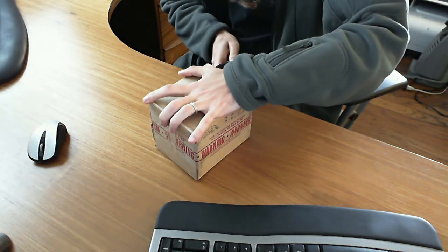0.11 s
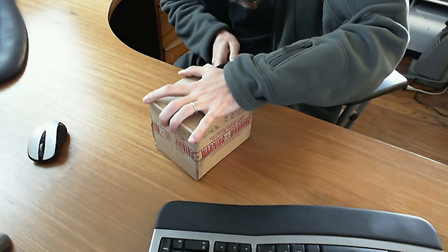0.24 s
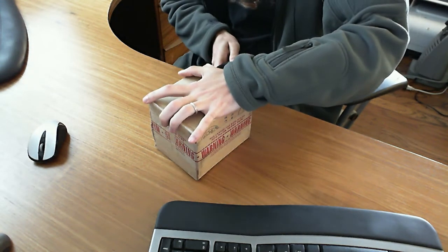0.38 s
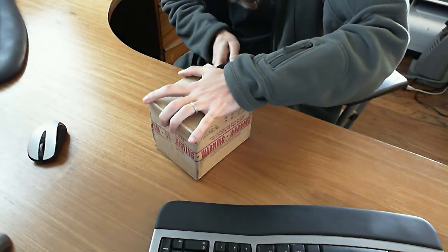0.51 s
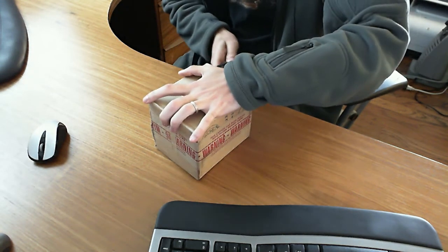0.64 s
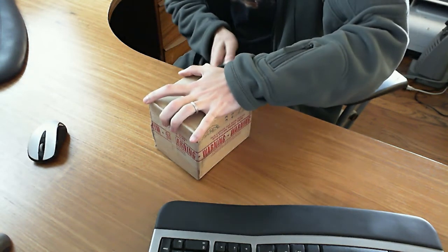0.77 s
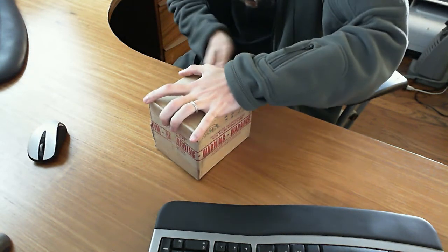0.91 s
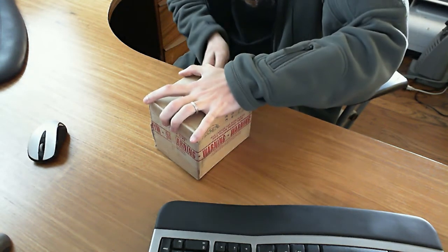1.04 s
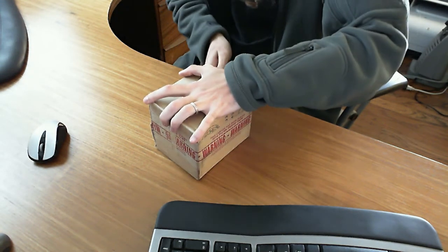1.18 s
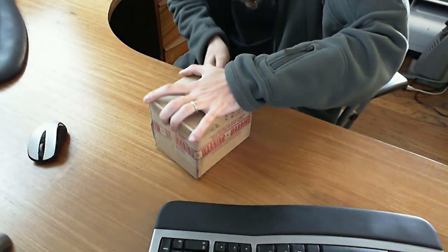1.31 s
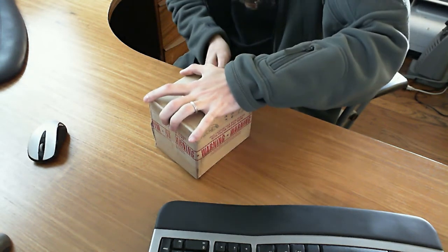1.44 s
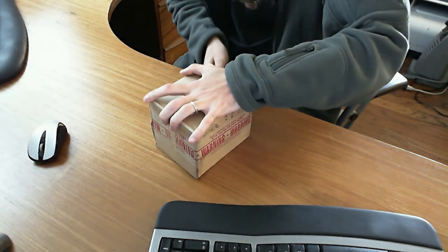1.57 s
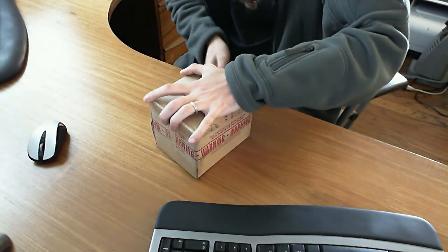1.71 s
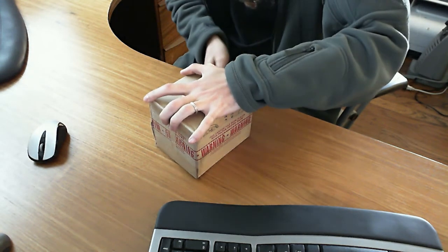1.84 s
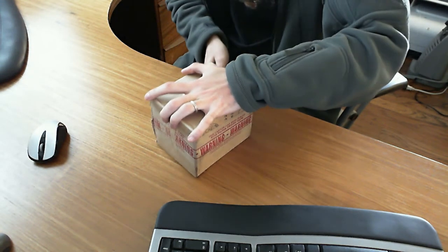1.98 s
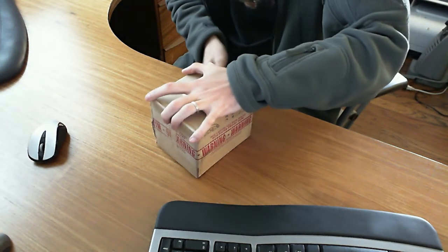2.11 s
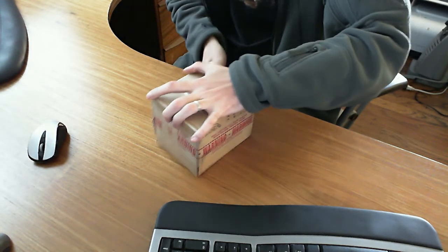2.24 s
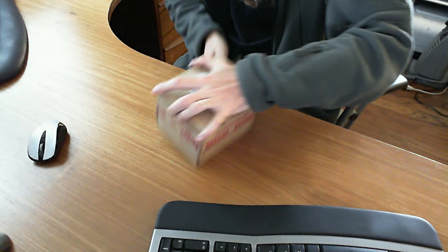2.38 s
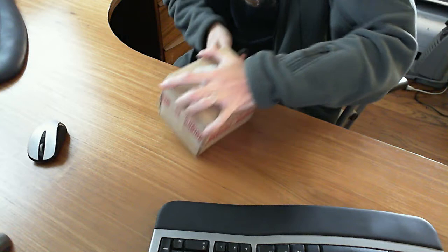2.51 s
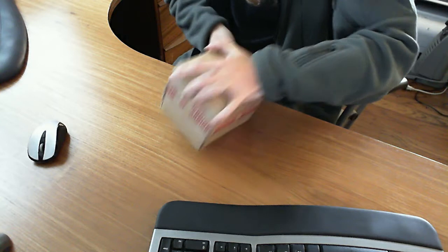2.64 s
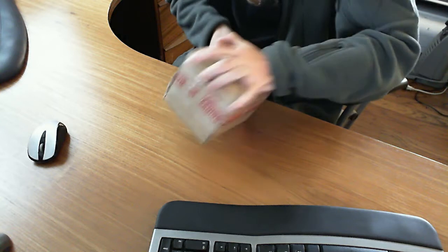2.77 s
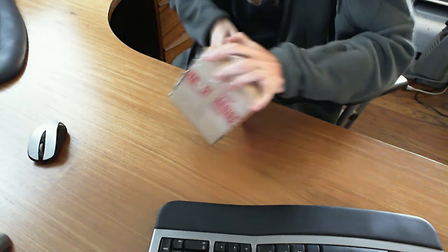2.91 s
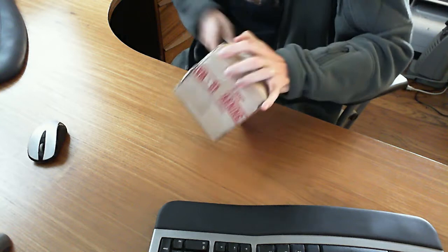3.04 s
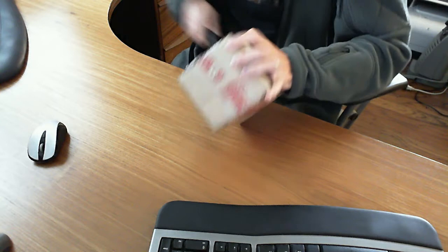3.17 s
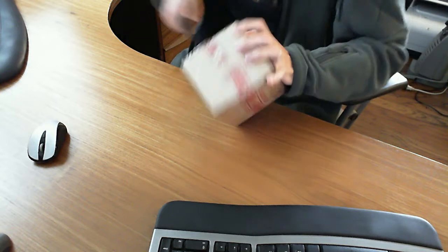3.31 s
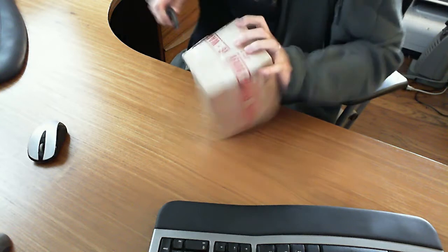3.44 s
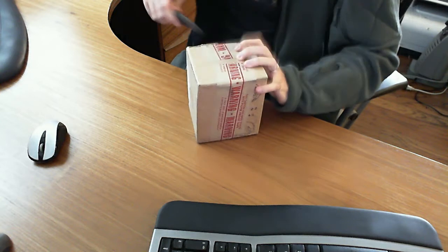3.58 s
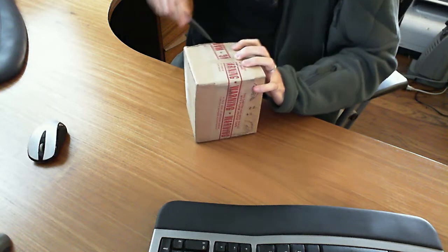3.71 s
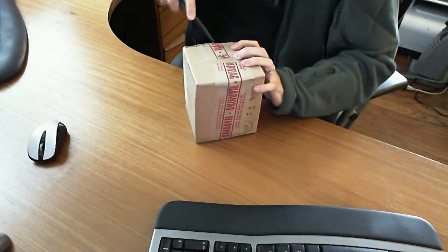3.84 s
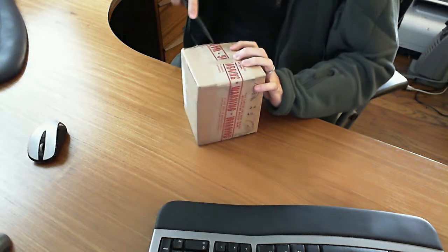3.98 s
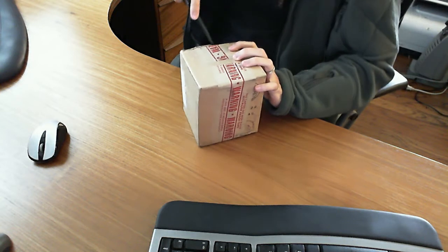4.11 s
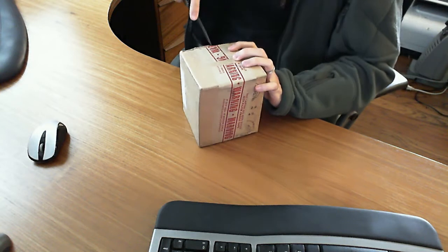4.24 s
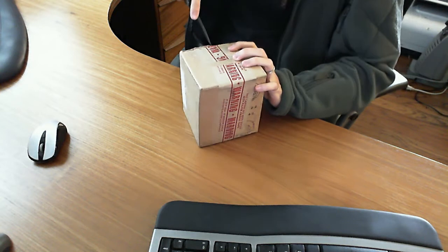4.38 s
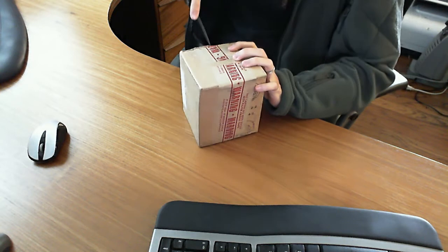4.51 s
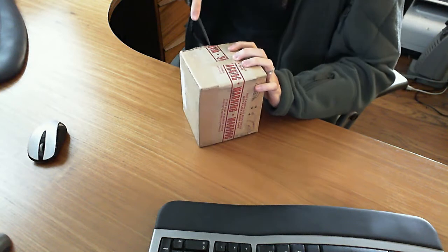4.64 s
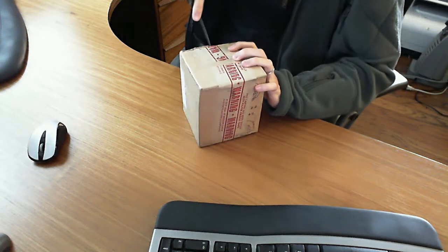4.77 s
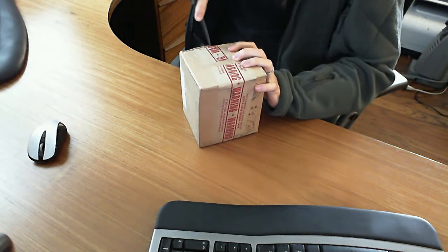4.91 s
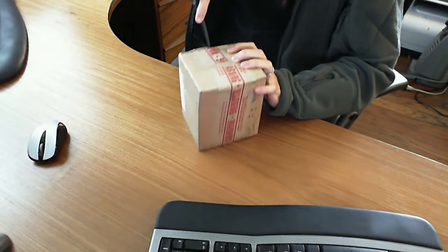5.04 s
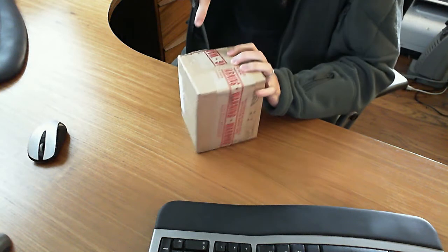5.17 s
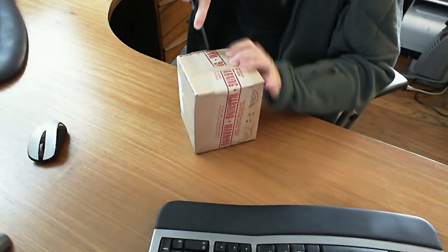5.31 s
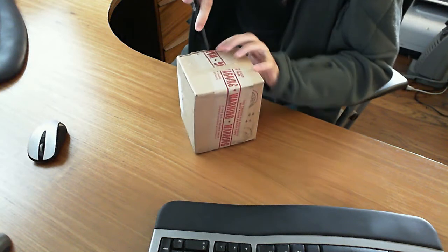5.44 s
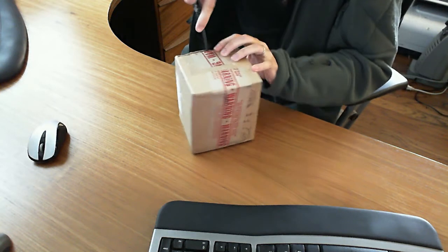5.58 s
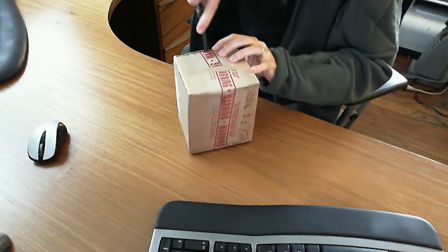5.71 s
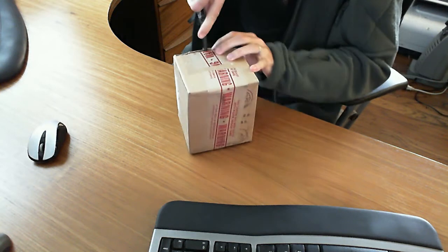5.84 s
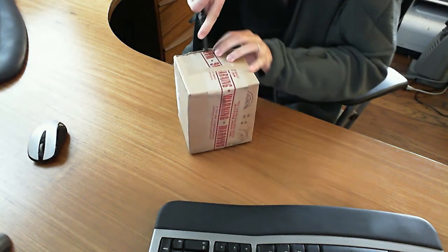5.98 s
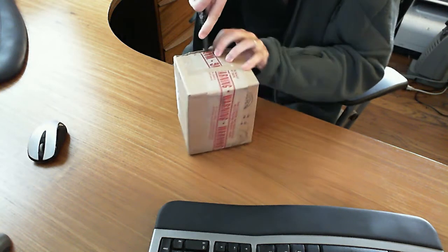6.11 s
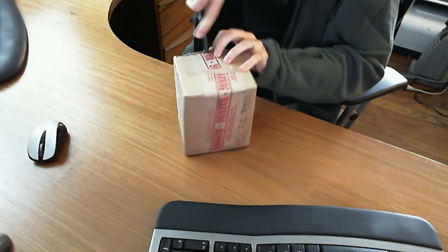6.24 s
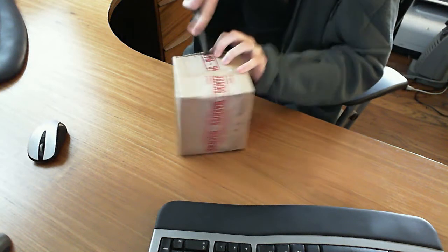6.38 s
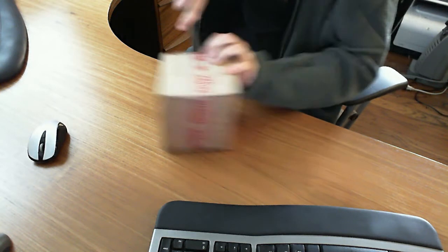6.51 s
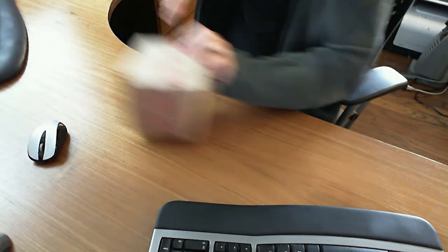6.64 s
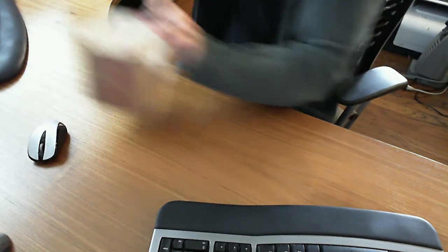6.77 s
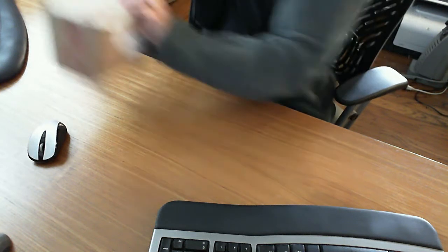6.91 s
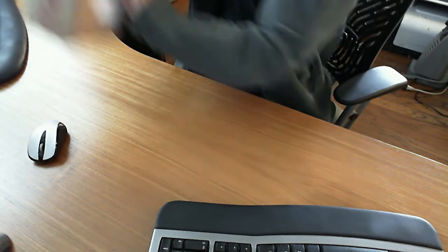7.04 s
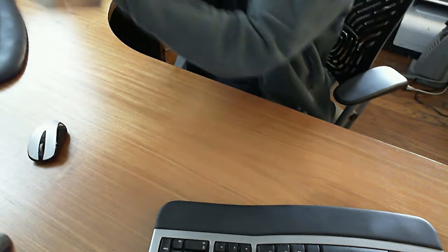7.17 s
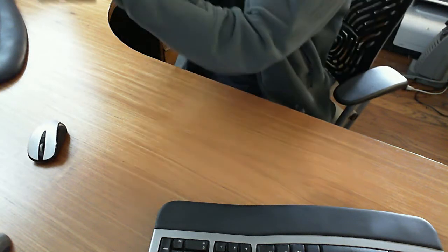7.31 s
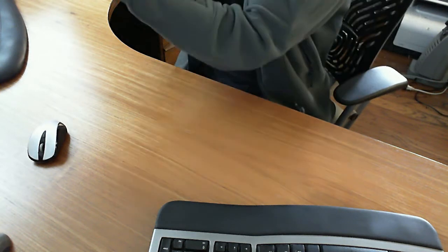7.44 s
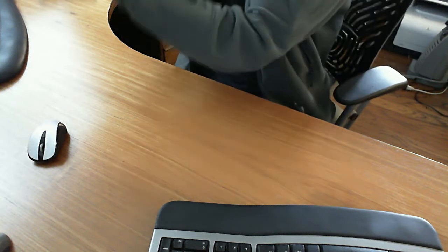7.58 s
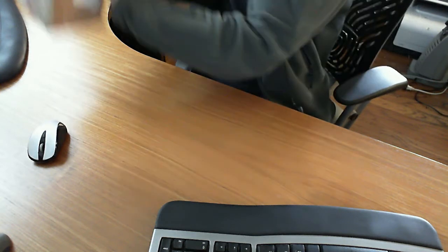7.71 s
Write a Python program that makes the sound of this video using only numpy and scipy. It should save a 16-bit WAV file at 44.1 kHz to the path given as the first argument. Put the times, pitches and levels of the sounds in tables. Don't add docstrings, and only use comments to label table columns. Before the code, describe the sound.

Close indoor sound from a cheap microphone with steady hiss, low fan hum and thin high whine. A sharp tape snap, then dry scratching strokes on a cardboard box. The box is turned over and thumps on the wooden desk, booming. After a quiet spell come glue ticks, knocks, a stuttering judder, corner taps and faint last clicks.

```python
import sys
import numpy as np
from scipy import signal
from scipy.fft import rfft, irfft, next_fast_len
from scipy.io import wavfile
from scipy.ndimage import uniform_filter1d, map_coordinates

SR = 44100
rng = np.random.default_rng(int(sys.argv[2]) if len(sys.argv) > 2 else 0)


def field_ratio(decibels):
    return 10 ** (np.asarray(decibels, dtype=float) / 20)


def transcribe(signal):
    frames = np.atleast_2d(signal).T
    limited = np.clip(frames, -1, 1)
    pcm = np.round(limited * 32767).astype(np.int16)
    wavfile.write(sys.argv[1], SR, pcm)


N = 342419
t = np.arange(N) / SR


def unit(x):
    return x / np.sqrt(np.mean(x ** 2) + 1e-20)


def peak(x):
    return x / np.abs(x).max()


def decay(u, t60):
    return field_ratio(-60 * u / t60)


def sine(hz, u):
    return np.sin(2 * np.pi * hz * u)


def onset(u, seconds):
    return 1 - np.exp(-u / seconds)


def along(points, hz):
    f, v = np.transpose(points)
    return np.interp(np.log(hz + 1), np.log(f + 1), v)


def filtered(x, response):
    size = next_fast_len(len(x) + 8192)
    return irfft(rfft(x, size) * response(np.fft.rfftfreq(size, 1 / SR)), size)[:len(x)]


def coloured(spectrum):
    return lambda hz: field_ratio(along(spectrum, hz))


def resonances(modes):
    def response(f):
        total = 0
        for k, (centre, width, db) in enumerate(modes):
            damping = 1j * f * width
            total = total + (-1) ** k * field_ratio(db) * damping / (centre ** 2 - f ** 2 + damping)
        return total
    return response


def friction(response, grain_db, patchy_db):
    clump = map_coordinates(rng.standard_normal(N // 100 + 4), [np.arange(N) / 100], order=1)
    slips = rng.standard_normal(N) * field_ratio(grain_db * clump)
    z = signal.stft(slips, nperseg=512)[2]
    patches = uniform_filter1d(rng.standard_normal(z.shape), 5, 0)
    patches = unit(uniform_filter1d(patches, 8, 1))
    patchy = signal.istft(z * field_ratio(patchy_db * patches), nperseg=512)[1][:N]
    return unit(filtered(patchy, response))


def strokes(peak_s, rise_s, fall_s, db, rest_db):
    roundness = 0.99
    power = np.full(N, field_ratio(rest_db) ** 2)
    for s, rise, fall, top_db in zip(peak_s, rise_s, fall_s, db):
        a, b = max(int((s - 2 * rise) * SR), 0), int((s + 2 * fall) * SR)
        u = t[a:b] - s
        distance = np.maximum(-u / rise, u / fall)
        power[a:b] += field_ratio(top_db - 20 * distance ** roundness) ** 2
    return np.sqrt(power)


# (pitch [Hz], t60 [s])
ROOM_DECAY = [(100, 0.2), (1000, 0.75), (6000, 0.41), (15000, 0.62)]


def echoed(hit, wet_db):
    wall_gap_s = 0.006
    hz, s, z = signal.stft(rng.standard_normal(SR // 3), SR, nperseg=256)
    tail = signal.istft(z * decay(s, along(ROOM_DECAY, hz)[:, None]), SR, nperseg=256)[1]
    tail = tail / np.linalg.norm(tail)
    wet = signal.fftconvolve(hit, np.pad(tail, (int(wall_gap_s * SR), 0)))
    return np.pad(hit, (0, len(wet) - len(hit))) + field_ratio(wet_db) * wet


def add(track, s, sound):
    part = track[round(s * SR):][:len(sound)]
    part += sound[:len(part)]


# (pitch [Hz], level [dB per Hz])
HISS_SPECTRUM = [(15, -8), (30, 7.5), (60, 3.5), (125, 1), (250, -9.5), (500, -6), (1000, -14), (2000, -16),
                 (4000, -19.5), (6000, -20), (9000, -21), (13000, -17.5), (15800, -15)]
# (pitch [Hz], width [Hz], level [dB])
FAN_TONES = [(176.4, 6.1, -56.5), (239, 40, -57.5)]


def background():
    out = field_ratio(-47.5) * friction(coloured(HISS_SPECTRUM), grain_db=0.2, patchy_db=0.3)
    for hz, width, db in FAN_TONES:
        out += field_ratio(db) * friction(resonances([(hz, width, 0)]), grain_db=-1.0, patchy_db=-1.3)
    return out


# (pitch [Hz], level [dB])
WHINE_TONES = [(6750, -57), (13500, -56.5)]


def whine():
    pictures_per_s, first_s = 7.5, 0.1075
    reading = np.abs((t - first_s) * pictures_per_s % 1 - 0.5) < 0.4
    gate = uniform_filter1d(reading * 1.0, size=60)
    return gate * sum(field_ratio(db) * np.sqrt(2) * sine(hz, t) for hz, db in WHINE_TONES)


# (time [s], offset [full scale])
OFFSET_DRIFT = [(0, -.054), (.86, -.054), (.96, -.042), (3.52, -.042), (3.6, -.032), (6, -.031),
                (6.35, -.018), (7.76, -.018)]


def offset():
    s, level = np.transpose(OFFSET_DRIFT)
    return np.interp(t, s, level)


# (time [s], rise [s], fall [s], low rumble level [dB], upper rumble level [dB])
DESK_JOLTS = [(0, .05, 0.08, -48, -51), (.62, .2, 0.34, -51, -64), (.9, 0.11, 1, -44, -48),
              (1.52, 0.1, 0.19, -34, -38), (1.85, 0.22, 0.25, -38, -48), (2.1, 0.25, 0.15, -45, -56),
              (3.46, 0.024, 0.13, -29, -52), (3.53, .015, 0.25, -38, -32.5), (5.3, 0.048, 0.14, -54, -43),
              (5.72, 0.077, .4, -41, -45), (6.1, 0.26, 0.4, -51.5, -37.5), (6.3, .03, 0.1, -53, -35),
              (6.7, 0.36, 0.31, -63, -55)]
# (pitch [Hz], level [dB per Hz])
RUMBLE_BANDS = [
    [(20, -19), (35, 8.5), (60, 0), (95, -14), (125, -32.5)],
    [(98, -4.5), (115, 7.5), (160, -3), (250, 5), (320, -36.5)],
]
# (frame level [dB], top level [dB])
CALM_LEVELS = (-59.5, -56)


def shaking():
    s, rise, fall, *levels = np.transpose(DESK_JOLTS)
    out = np.zeros(N)
    for db, calm_db, band in zip(levels, CALM_LEVELS, RUMBLE_BANDS):
        rumble = friction(coloured(band), grain_db=1.5, patchy_db=3.0)
        out += strokes(s, rise, fall, db, calm_db) * rumble
    return out


# (pitch [Hz], level [dB per Hz])
TAPE_SPECTRUM = [(2940, -14.5), (5000, -3), (5500, -3), (6000, -2), (7330, 3.5), (9320, 3), (10400, 0.5),
                 (11900, 2.5), (13700, -4.5), (15700, -11.5)]
# (pitch [Hz], width [Hz], level [dB])
NAIL_MODES = [(1570, 460, -5), (2330, 180, -3), (3050, 1550, -5.5), (3990, 580, 0), (4700, 900, -6.5)]
# (pitch [Hz], width [Hz], level [dB])
BOX_MODES = [(286, 76, 1.5), (463, 232, -1.5), (639, 151, -1), (850, 172, -2.5), (1030, 486, -5.5),
             (1416, 580, -13)]
# (peak time [s], rise [s], fall [s], hiss level [dB], pressure on the card [dB])
SCRATCH_STROKES = [(.445, .015, 0.053, -47, -6), (.585, 0.062, 0.3, -41.5, -2.5),
                   (.74, .2, 0.25, -48.5, -20), (0.863, 0.16, 0.014, -37, -17),
                   (0.881, 0.0096, .04, -18.5, -13), (.9, .01, 0.17, -26, -9.5),
                   (1.076, 0.074, 0.097, -26, -6.5), (1.113, .06, 0.063, -30.5, -18),
                   (1.22, 0.096, .08, -33, -12.5), (1.243, 0.085, 0.09, -31, -10.5),
                   (1.265, .06, 0.064, -33.5, -8), (1.36, 0.086, 0.11, -34, -10),
                   (1.394, 0.11, 0.083, -32.5, -15), (1.49, .05, .08, -34, -5.5),
                   (1.515, 0.07, 0.095, -32, -6), (1.64, .08, .08, -43, -12),
                   (1.695, 0.099, 0.095, -31.5, -9.5), (1.77, .04, .08, -37.5, -6),
                   (1.8, 0.089, 0.09, -35, -8), (1.835, .06, 0.073, -40.5, -14),
                   (2.115, 0.12, 0.12, -38, -8.5), (2.36, 0.18, 0.24, -40, -6),
                   (2.46, 0.21, 0.18, -40.5, -11)]
TURNING_STROKES = [(2.76, 0.16, 0.67, -43, -13), (2.95, 0.42, .05, -51, 0.5),
                   (3.025, 0.016, 0.044, -40.5, 7.5), (3.04, .015, 0.099, -44.5, 1),
                   (3.29, .08, .3, -44.5, -15), (3.43, 0.22, 0.28, -41.5, -21),
                   (3.474, 0.028, 0.065, -47, 11), (3.526, 0.035, 0.079, -31, -19),
                   (3.538, 0.023, 0.039, -35.5, 6), (3.58, .02, 0.21, -50.5, 5.5)]
PRYING_STROKES = [(5.038, 0.27, 0.49, -49.5, -4.5), (5.279, 0.011, 0.075, -46, 4.5),
                  (5.39, 0.36, .1, -48, -15), (5.6, 0.96, .1, -55, 0.5), (5.682, 0.0056, .04, -36, -11),
                  (5.757, 0.094, 0.11, -29.5, -12.5), (5.86, .05, .2, -52.5, 5),
                  (6.055, 0.13, 0.24, -44, 7), (6.19, .05, 0.72, -57, 5), (6.301, .011, 0.043, -41, 13.5),
                  (6.33, .02, 0.46, -45.5, 3), (6.55, 0.53, 0.29, -40, -9), (6.722, 0.12, 0.16, -40, -1.5),
                  (6.8, 0.089, 0.12, -46.5, 2.5), (6.976, 0.25, 0.51, -50, -5.5),
                  (7.292, 0.039, 0.049, -45, -9), (7.388, 0.015, 0.034, -34.5, -11.5),
                  (7.41, 0.11, 0.2, -43, -12), (7.717, 0.004, 0.023, -35.5, -9),
                  (7.727, 0.01, 0.016, -30.5, -28), (4.482, .006, .04, -48, -20),
                  (7.75, 0.053, .15, -45.5, 0)]


def rubbing():
    resting_db, resting_card_db = -60, -57
    nail_db, nail_per_pressure = -5, 0.46
    s, rise, fall, db, press_db = np.transpose(SCRATCH_STROKES + TURNING_STROKES + PRYING_STROKES)
    tape = strokes(s, rise, fall, db, resting_db)
    tape = tape * friction(coloured(TAPE_SPECTRUM), grain_db=0.5, patchy_db=2.0)
    nail_level = db + nail_db + nail_per_pressure * np.minimum(press_db, 0)
    nail = strokes(s, rise, fall, nail_level, resting_db + nail_db)
    nail = nail * friction(resonances(NAIL_MODES), grain_db=1.5, patchy_db=2.5)
    card = strokes(s, rise, fall, db + press_db, resting_card_db)
    card = card * friction(resonances(BOX_MODES), grain_db=1.5, patchy_db=2.0)
    return tape + nail + card


# (time [s], peak level [dB], lower pitch [Hz], upper pitch [Hz], hardness [dB])
BOX_KNOCKS = [(0.427, -33.5, 366, 655, -6), (0.874, -12, 644, 720, -16), (0.8865, -21, 600, 696, -19),
              (0.893, -19, 513, 600, -22), (1.027, -27, 425, 610, -16), (1.468, -28.5, 480, 650, -5),
              (1.687, -26.5, 590, 730, -5), (3.0173, -20, 635, 1270, -5), (3.5274, -13, 460, 886, -12),
              (3.0227, -19, 660, 1220, -5), (3.523, -18.5, 646, 1150, -7), (5.275, -32, 515, 840, -16),
              (5.677, -28.5, 440, 800, -10), (5.698, -29.5, 550, 690, -5), (5.72, -33, 476, 725, -15),
              (5.848, -33, 514, 780, -18), (5.87, -30, 412, 760, -20), (6.152, -16.5, 440, 775, -15.5),
              (6.197, -27.5, 416, 630, -23), ]
# (pitch [Hz], width [Hz], level [dB])
EDGE_MODES = [(1403, 170, -2), (1750, 100, -2.5), (2520, 550, -5.5), (2730, 230, -19)]


def knocks():
    out, u = np.zeros(N), t[:SR // 6]
    for s, db, low_hz, high_hz, hard_db in BOX_KNOCKS:
        wall = (sine(low_hz, u) + 0.66 * sine(high_hz, u)) * decay(u, 0.036)
        push = rng.standard_normal(len(u)) * decay(u, 0.0084)
        body = peak(wall + 0.5 * peak(filtered(push, resonances(BOX_MODES))))
        edges = field_ratio(hard_db) * peak(filtered(push, resonances(EDGE_MODES)))
        add(out, s, field_ratio(db) * echoed(body + edges, wet_db=-13.5))
    return out


# (time [s], peak level [dB], film pitch [Hz], dull part relative level [dB], dull pitch [Hz])
TAPE_SNAPS = [(0.4278, -30.5, 6760, -4, 4860), (0.8739, -5.5, 8000, -7, 3420),
              (0.8754, -9.5, 12000, -15, 1560), (0.8802, -9, 11500, -16, 3200),
              (0.885, -9.5, 12000, -11, 3200), (0.891, -14, 12000, -3, 4700),
              (3.022, -19.5, 9000, -18, 4260), (3.4535, -30, 7800, -10, 2920),
              (3.5246, -11, 6000, -8, 4300), (3.821, -39, 6750, -1, 3370), (4.764, -37, 6800, -22, 3620),
              (5.277, -31, 7110, -18, 5080), (5.293, -28.5, 7600, -9.5, 4100),
              (5.707, -19, 9120, -12, 5150), (5.7258, -18.5, 7250, -14, 4440), (6.11, -39, 6760, -7, 3310),
              (6.153, -35, 6750, -18, 2540), (6.2917, -22, 12700, -9.5, 3200),
              (6.456, -28.5, 7670, -7, 2670), (7.4994, -34, 6750, -30, 3370)]
GLUE_TICKS = [(3.028, -15.5, 8900, -25, 2500), (3.031, -21, 8300, -25, 2500),
              (3.0335, -22, 8600, -25, 2500), (3.039, -18, 8300, -25, 2500), (3.508, -20, 9500, -6, 4760),
              (4.4735, -26, 6930, -13, 4500), (5.283, -29, 7800, -20, 5030), (5.2858, -29, 6800, -9, 5030),
              (5.676, -16.5, 7450, -16, 2800), (5.685, -30, 8400, -25, 5000),
              (5.6981, -9.5, 7300, -20, 4580), (6.049, -35, 10900, -8, 4500),
              (6.056, -29, 11500, -20, 3500), (6.269, -38, 6800, -1, 3400), (7.3773, -25, 6500, -3, 6200),
              (7.3805, -22, 6500, -2, 6300), (7.3855, -23, 11000, -8, 8000), (7.3885, -23, 11500, -4, 7800),
              (7.391, -29, 11000, -4, 7800), (7.3943, -28, 8200, -10, 4000), (7.41, -32, 8500, -20, 4000),
              (7.723, -25, 9000, -20, 4500), (7.729, -23, 9000, -20, 4500)]


def snaps():
    snap_t60, tick_t60 = 0.014, 0.006
    crack_db, crack_s = -10.5, 0.00012
    out, u = np.zeros(N), t[:SR // 8]
    crack = field_ratio(crack_db) * peak(u * np.exp(-u / crack_s) * np.cos(u / crack_s))
    rows = [(*row, snap_t60) for row in TAPE_SNAPS] + [(*row, tick_t60) for row in GLUE_TICKS]
    for s, db, film_hz, dull_db, dull_hz, t60 in rows:
        sizes = field_ratio(0.95 * rng.standard_normal(len(u)))
        bright_slips, dull_slips = rng.standard_normal((2, len(u))) * sizes
        bright = filtered(bright_slips * decay(u, t60), coloured(TAPE_SPECTRUM))
        taut = resonances([(film_hz, 2200, 0)])
        film = filtered(bright, lambda f: 0.59 + taut(f))
        panel = resonances([(dull_hz, 750, 0)])
        card = filtered(dull_slips * decay(u, t60 * 0.41), lambda f: panel(f) ** 2)
        burst = peak(film) + field_ratio(dull_db) * peak(card)
        add(out, s, field_ratio(db) * echoed(burst * onset(u, 0.00018) + crack, wet_db=-9.0))
    return out


# (start [s], end [s], pitch [Hz], width [Hz], level [dB])
SINGING_DRAGS = [(0.883, 0.975, 4500, 450, -43), (1.027, 1.11, 3950, 740, -36.5),
                 (1.018, 1.08, 1610, 150, -46), (1.199, 1.26, 3630, 2400, -43),
                 (1.326, 1.386, 4020, 1200, -44), (1.469, 1.534, 2920, 270, -45),
                 (1.48, 1.526, 4700, 280, -51), (1.685, 1.7, 3100, 500, -40), (1.675, 1.707, 850, 150, -44),
                 (3.022, 3.092, 1270, 700, -46), (3.024, 3.085, 680, 220, -45),
                 (3.027, 3.078, 8650, 2100, -40.5), (3.289, 3.37, 7500, 1800, -47),
                 (3.349, 3.533, 8700, 2400, -41.5), (5.72, 5.77, 716, 220, -41.5),
                 (5.72, 5.8, 2000, 2100, -51), (6.333, 6.448, 780, 330, -46), (6.69, 6.81, 8600, 900, -51),
                 (6.675, 6.74, 2900, 400, -51), (6.675, 6.745, 2100, 1200, -50),
                 (6.695, 6.745, 3780, 400, -44.5), (6.6, 6.65, 3600, 900, -52),
                 (7.72, 7.735, 9000, 700, -36), (7.712, 7.726, 4400, 700, -40),
                 (7.724, 7.76, 4406, 600, -46), (7.714, 7.722, 6400, 900, -41)]


def singing():
    out, u = np.zeros(N), t[:SR // 5]
    for start, end, hz, width, db in SINGING_DRAGS:
        grit = rng.standard_normal(len(u)) * field_ratio(3.6 * rng.standard_normal(len(u)))
        panel = resonances([(hz, width, 0)])
        ring = unit(filtered(grit, lambda f: panel(f) ** 2))
        bite = np.clip(u / 0.0075, 0, 1)
        ease = np.clip((end - start - u) / min(0.049, end - start) + 0.5, 0, 1)
        add(out, start, field_ratio(db) * echoed(ring * (bite * ease), wet_db=-7.5))
    return out


# (time [s], peak level [dB], pitch [Hz], t60 [s])
LANDINGS = [
    (3.452, -23, 145, 0.064),
    (3.488, -27, 129, 0.074),
    (3.5247, -6.5, 184, 0.04),
    (3.5373, -8.5, 238, .025),
    (3.558, -23.5, 144, 0.17),
    (3.572, -25, 141, 0.14),
    (3.6135, -24, 200, 0.028),
]
# (pitch [Hz], level [dB], t60 [s])
DESK_MODES = [(142.3, 3.5, 0.21), (168, -2, .2), (239, -1.5, 0.26), (254, 0, .25), (293, 3, 0.2),
              (317.6, -5, 0.25), (426, -10, .15), (472, -9, .1), (520, -10, 0.09), (620, -12, .1)]


def thumps():
    out, u = np.zeros(N), t[:SR // 2]
    for s, db, push_hz, push_t60 in LANDINGS:
        boom = np.zeros(len(u))
        for hz, level, t60 in DESK_MODES:
            boom -= field_ratio(level + rng.normal(0, 2.7)) * decay(u, t60) * sine(hz, u)
        push = -sine(push_hz, u) * onset(u, 0.0055) * decay(u, push_t60)
        thump = peak(push + 0.036 * boom * onset(u, 0.008))
        add(out, s, field_ratio(db) * echoed(thump, wet_db=-8.5))
    return out


# (time [s], peak level [dB], pitch [Hz], t60 [s])
CORNER_TAPS = [(3.4524, -20.5, 480, 0.017), (3.4535, -28.5, 1280, .01), (3.477, -37, 600, .03),
               (3.544, -25, 420, .03), (3.551, -24, 560, .04), (3.565, -26, 330, .04),
               (3.583, -28.5, 520, 0.036), (6.709, -35, 500, .04), (6.72, -34, 480, .04),
               (6.801, -37.5, 1030, .04), (5.2865, -35, 330, 0.027), (5.301, -36, 330, 0.027),
               (5.313, -37, 300, .03), (6.2692, -31, 560, 0.018), (6.2941, -12, 560, 0.011),
               (6.3, -14.5, 360, .012), (6.306, -30, 450, 0.018), (6.3125, -24.5, 475, .025),
               (6.32, -29, 370, 0.018), (6.327, -33, 990, .02), (6.336, -31, 330, 0.033),
               (6.349, -34, 620, 0.018), (6.357, -33, 720, 0.027), (6.363, -31, 480, 0.022),
               (6.3842, -28, 640, 0.017), (6.403, -30, 760, .02), (6.413, -30, 704, .03),
               (6.427, -32, 716, .02), (6.437, -33, 646, .02), (6.7805, -35, 452, 0.024)]


def taps():
    out, u = np.zeros(N), t[:SR // 16]
    for s, db, hz, t60 in CORNER_TAPS:
        dip = -sine(hz, u) * onset(u, 0.00038) * decay(u, t60)
        grit = rng.standard_normal(len(u)) * decay(u, 0.0093)
        grit = filtered(grit, resonances(BOX_MODES + EDGE_MODES))
        add(out, s, field_ratio(db) * echoed(peak(dip) + 0.24 * peak(grit), wet_db=-13))
    return out


# (time [s], peak level [dB])
FOOT_SLIPS = [(5.936, -34.5), (5.949, -34), (5.96, -33), (5.97, -32), (5.9765, -26.5), (5.9845, -27),
              (5.993, -28), (6.0, -27), (6.0065, -26), (6.0145, -24), (6.0225, -23), (6.0314, -22),
              (6.0416, -21.5), (6.0526, -23), (6.0555, -26), (6.068, -23), (6.0725, -31), (6.0854, -27),
              (6.1105, -23), (6.134, -30)]
# (pitch [Hz], share, t60 [s])
HOLLOW_MODES = [(260, 0.33, 0.017), (438, 1, 0.025), (560, 0.32, 0.019), (800, 0.28, .02)]
# (pitch [Hz], width [Hz], level [dB])
GRATE_MODES = [(1050, 210, -2), (1400, 300, -1.5), (1780, 330, -2), (3400, 1500, -14)]


def judder():
    out, u = np.zeros(N), t[:SR // 16]
    for s, db in FOOT_SLIPS:
        ring = np.zeros(len(u))
        for hz, share, t60 in HOLLOW_MODES:
            ring -= share * field_ratio(rng.normal(0, 1.2)) * decay(u, t60) * sine(hz, u)
        grate = filtered(rng.standard_normal(len(u)) * decay(u, 0.0076), resonances(GRATE_MODES))
        add(out, s, field_ratio(db) * (peak(ring * onset(u, 0.002)) + field_ratio(-13) * peak(grate)))
    return out


def scene():
    hands = shaking() + rubbing() + snaps() + singing()
    box = knocks() + thumps() + taps() + judder()
    return (background() + hands + box)[None]


def low_pass(x):
    return signal.sosfilt(signal.butter(12, 16600, fs=SR, output="sos"), x)


def record(dry):
    top_hz = 15830
    limited = filtered(dry[0] + whine(), lambda hz: hz < top_hz)
    mix = limited[None] + offset()
    return low_pass(mix)


dry = scene()
out = record(dry)
transcribe(out)
```